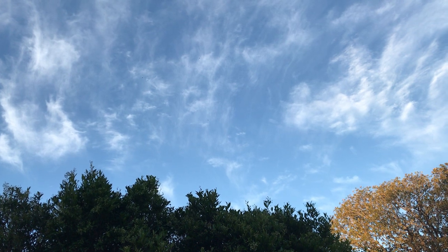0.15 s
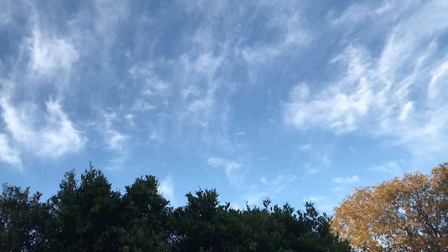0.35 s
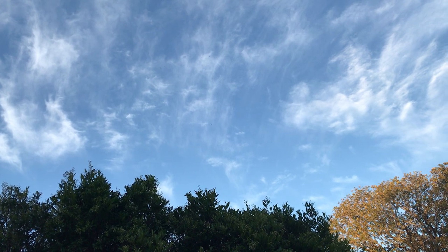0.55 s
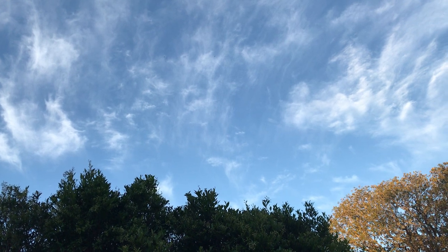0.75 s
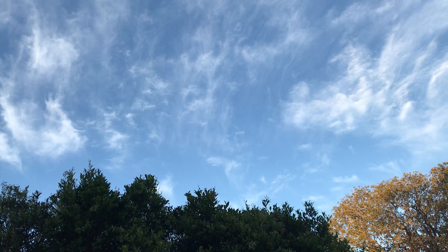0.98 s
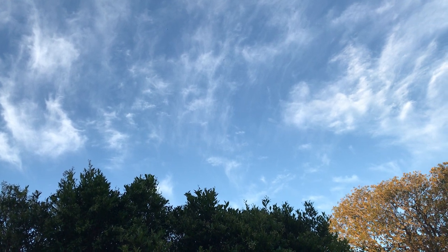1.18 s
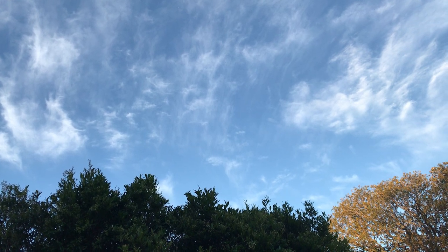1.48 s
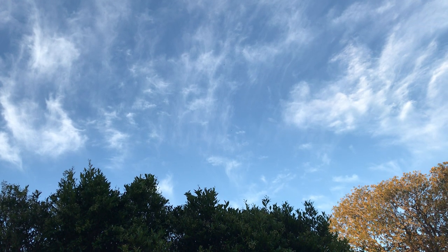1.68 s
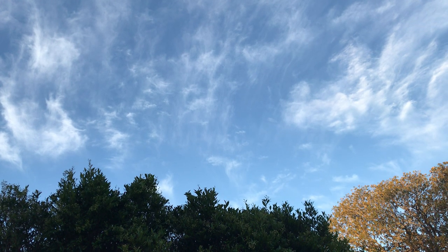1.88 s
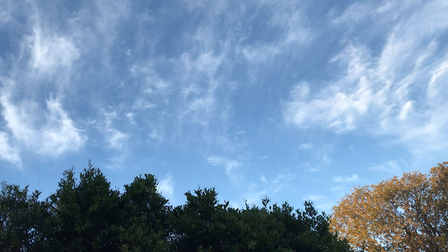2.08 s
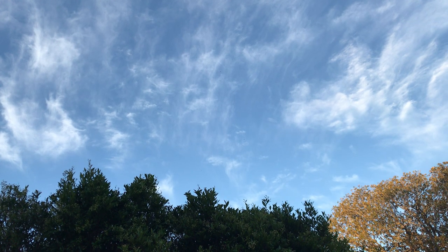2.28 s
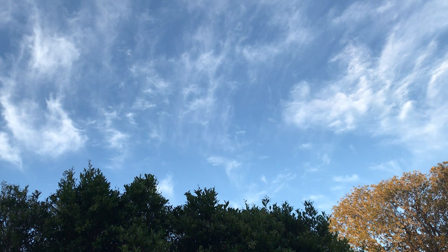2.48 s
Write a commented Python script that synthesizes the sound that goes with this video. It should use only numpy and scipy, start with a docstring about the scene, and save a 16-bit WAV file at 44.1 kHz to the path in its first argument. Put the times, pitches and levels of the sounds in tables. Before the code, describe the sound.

A magpie carols outdoors over a faint, steady distant rumble. From about 0.2 seconds it whistles in two overlapping tones, breaking into quick, slightly hoarse trills until 1 second. A small bird chirps faintly further off in the short pause. The magpie flutters on a low note from 1.2 to 1.6 seconds, then trills higher and slides down, ending near 2.4 seconds with a soft echo from the trees.

```python
"""A distant low rumble and faint hiss, then a magpie starts to carol outdoors. The two sides of its
voice box (the syrinx) whistle apart or together, beating where their pitches come close, and trill
quickly in between. A small bird chirps further off, a faint whistle fills a pause in the song,
and trees send back a soft echo."""
import sys
import numpy as np
from scipy import signal
from scipy.fft import rfft, irfft, next_fast_len
from scipy.io import wavfile
from scipy.ndimage import uniform_filter1d, map_coordinates

SR = 44100
rng = np.random.default_rng(int(sys.argv[2]) if len(sys.argv) > 2 else 0)


def put_to_file(sound):
    """Save the sound as 16-bit audio at rate SR, in the file named by the first command-line argument."""
    columns = np.atleast_2d(sound).T  # one column per channel
    safe = np.clip(columns, -1, 1)
    whole_steps = np.round(safe * 32767)
    wavfile.write(sys.argv[1], SR, whole_steps.astype(np.int16))


N = 116865
T = np.arange(N) / SR


def amp(db):
    """Turn decibels into a gain."""
    return 10 ** (np.asarray(db) / 20)


def unit(x):
    """Scale to an average power of 1."""
    return x / np.sqrt(np.mean(x ** 2) + 1e-20)


def along(points, hz):
    """Look up a table's value at any frequency."""
    freqs, values = np.transpose(points)
    return np.interp(np.log(hz + 1), np.log(freqs + 1), values)


def curves(rows):
    """Draw each column as a curve over time."""
    times, *columns = np.transpose(rows)
    return [np.interp(T, times, c) for c in columns]


def wobble(rate):
    """A smooth curve through `rate` random points a second."""
    return map_coordinates(rng.standard_normal(N), [T * rate], order=3, mode="wrap")


def filtered(x, gain):
    """Give each frequency its own gain."""
    m = next_fast_len(N + SR // 2)
    return irfft(rfft(x, m) * gain(np.fft.rfftfreq(m, 1 / SR)), m)[:N]


# Tone of the two background noises (frequency [Hz], relative level [dB])
RUMBLE = [(20, -38.5), (32, -18), (48, -3.5), (65, -3.5), (85, -3), (125, -9.5), (180, -12), (250, -19.5),
          (400, -30), (550, -32.5), (1000, -30), (1400, -35.5), (2000, -41), (3300, -46), (4700, -50),
          (6500, -93)]
HISS = [(4000, -34), (5000, -1), (7000, -4), (9300, -5), (10400, -8.5), (11800, -4), (15500, -6)]
def background():
    """Distant rumble and faint hiss, with a wavering 84 Hz drone."""
    rumble = unit(filtered(rng.standard_normal(N), lambda hz: amp(along(RUMBLE, hz))))
    hiss = unit(filtered(rng.standard_normal(N), lambda hz: amp(along(HISS, hz))))
    drone = (1 + .88 * wobble(9.07)) * np.sin(2 * np.pi * 84 * T + wobble(6.1))
    return amp(-50) * rumble + amp(-78) * hiss + amp(-54.5) * unit(drone)


def tree_echo(x, build_s=.045, decay_s=.5):
    """Trees scatter the sound into a blur that dies quickly."""
    t = T[:SR]
    tail = rng.standard_normal(SR) * amp(-60 * t / decay_s) * (1 - np.exp(-t / build_s))
    return amp(-36) * signal.fftconvolve(x, tail / np.linalg.norm(tail))[:N]


# A far bird's note (time [s], pitch [Hz], level [dB])
FAR_NOTE = [(1.05, 980, -62.5), (1.11, 1015, -64), (1.14, 1054, -63)]
def far_whistle():
    """A faint, plain note in the song's pause."""
    strength, phase, _ = syrinx_side(FAR_NOTE)
    return strength * np.cos(phase)


# Chirps (time [s], length [s], start pitch [Hz], end pitch [Hz], level [dB], relative overtone [dB])
CHIRPS = [(1.084, 0.027, 2700, 2945, -62, -4.5), (1.098, 0.033, 3800, 4380, -62.5, -11),
          (1.138, 0.032, 4350, 4420, -74, -20), (1.166, .022, 5200, 5700, -75, -23),
          (1.612, 0.018, 5400, 6160, -78, -14), (1.903, 0.054, 2350, 3324, -56, -5)]
def small_bird():
    """Short rising chirps, each with one overtone an octave up."""
    out = np.zeros(N)
    for start, length, start_hz, end_hz, db, overtone_db in CHIRPS:
        progress = np.clip((T - start) / length, 0, 1)
        hz = start_hz + (end_hz - start_hz) * np.sin(progress * np.pi / 2)
        phase = 2 * np.pi * np.cumsum(hz) / SR + .3 * wobble(420)
        tone = np.sin(phase) + amp(overtone_db) * np.sin(2 * phase)
        out += amp(db) * np.sin(np.pi * progress) * tone
    return out


def trill(rows, peak_s, shape, uneven=.2):
    """A quick swing of pitch and level, lined up on peak_s; shape above 0 sharpens the pitch peaks."""
    rate, swing_hz, swing_db = curves(rows)
    turn = 2 * np.pi * np.cumsum(rate) / SR
    turn = turn - np.interp(peak_s, T, turn) + uneven * wobble(40)
    swing = np.array([swing_hz * (np.cos(turn) + shape * np.cos(2 * turn)), swing_db * np.cos(turn)])
    return swing * (1 + uneven * wobble(70))


SHAKE_HZ = 515
# Hoarseness of the voice (time [s], roughness [0-1])
HOARSENESS = [(.2, .3), (.235, 0.05), (.35, 0.04), (.368, 0.36), (.41, 0.48), (.445, 0.2), (.53, 0.09),
              (.71, 0.13), (.73, 0.3), (.81, 0.4), (.83, 0.08), (1.04, 0.13), (1.19, 0.31), (1.27, 0.07),
              (1.62, 0), (1.66, 0.42), (1.85, 0.19), (1.91, 0.07), (2.36, 0.08)]
def syrinx_side(rows, swing=(0, 0), fade_s=.0076):
    """One side of the voice box whistles; its strength and phase shake when hoarse."""
    hz, db = curves(rows)
    hz, db = hz + swing[0], db + swing[1]
    rough, = curves(HOARSENESS)
    fade = np.clip(np.minimum(T - rows[0][0], rows[-1][0] - T) / fade_s + .5, 0, 1)
    strength = amp(db) * np.sin(fade * np.pi / 2) ** 2 * (1 + rough * wobble(SHAKE_HZ))
    phase = 2 * np.pi * np.cumsum(hz) / SR + .51 * rough * wobble(SHAKE_HZ)
    return strength, phase, hz


def syrinx_note(sides, overtones, throat, coupling=0):
    """Two sides close in pitch make extra tones; throat and beak colour the overtones."""
    live = np.flatnonzero(sum(abs(s[0]) for s in sides))  # samples that sound
    strength, phase, hz = np.transpose(np.array(sides)[:, :, live], axes=(1, 0, 2))
    total = np.sqrt(np.sum(strength ** 2, axis=0) + 1e-14)
    beat = phase[-1] - phase[0]
    gap_hz = abs(hz[-1] - hz[0]) + 1
    overlap = (len(sides) - 1) * 2 * abs(strength[0] * strength[-1]) / total ** 2
    # The sides interact most about 226 Hz apart, and quickly less past 410 Hz.
    link = coupling * overlap * np.exp(-.5 * (np.log2(gap_hz / 226) / .91) ** 2)
    link /= 1 + (gap_hz / 410) ** 12
    above = strength[-1] * np.cos(phase[-1] + beat)
    below = .73 * strength[0] * np.cos(phase[0] - beat)
    sound = np.sum(strength * np.cos(phase), axis=0) + link * (above + below)
    # Overtones: 2 to 11 times each pitch, plus sums of the two pitches.
    k = np.arange(2, 12)[:, None, None]
    multiples = lambda v: np.concatenate([k * v, (k - 1) * v[0] + v[-1]], axis=1)
    shake = k * .13 * np.sqrt(overlap) * wobble(SHAKE_HZ)[live]
    waves = np.cos(multiples(phase) + shake) * (1 + .49 * link * np.cos(beat))
    treble = np.clip((multiples(hz) - 5000) / 600, 0, 1)  # "mid" below 5 kHz, "treble" above 5.6
    rolloff_db = -2 * np.clip(k - 8, 0, 2)
    balance = np.vstack([abs(strength) / total, 1.3 * overlap])
    colour = amp(along(throat, multiples(hz)) + rolloff_db) * balance
    flutter = total / np.sqrt(abs(uniform_filter1d(total ** 2, SR // 50)) + 1e-14)
    for share, db in zip((1 - treble, treble), curves(overtones)):
        weight = colour * share
        weight /= np.sqrt(np.sum(weight ** 2, axis=(0, 1)) + 1e-12)
        sound += flutter * amp(db[live]) * np.sum(weight * waves, axis=(0, 1))
    return np.bincount(live, np.sqrt(2) * sound, N)


# A lead-in note, then each side's whistle (time [s], pitch [Hz], level [dB])
LEAD_IN = [(.188, 1750, -71), (.204, 1863, -63), (.216, 1770, -68), (.23, 1725, -55.5)]
OPENING_LOW = [(0.205, 995, -51), (0.225, 1225, -50), (0.245, 1231, -39.5), (0.265, 1222, -37.5),
               (0.29, 1238, -31.5), (0.31, 1219, -31), (0.325, 1190, -28), (0.343, 1219, -30),
               (0.372, 1250, -38.5), (0.395, 1226, -50), (0.425, 1135, -54.5), (0.46, 1221, -63),
               (0.495, 1370, -55), (0.54, 1328, -57.5), (0.6, 1382, -58.5), (0.675, 1349, -50.5),
               (0.708, 1316, -38.5), (0.724, 1295, -46)]
OPENING_HIGH = [(0.362, 1608, -47), (0.375, 1659, -45.5), (0.395, 1735, -51), (0.412, 1510, -49),
                (0.44, 1600, -39), (0.46, 1645, -43.5), (0.475, 1563, -46), (0.497, 1591, -40.5),
                (0.535, 1542, -48), (0.6, 1538, -46.5), (0.65, 1486, -45), (0.685, 1504, -42),
                (0.705, 1410, -41), (0.722, 1325, -35)]
# Overtones (time [s], mid level [dB], treble level [dB])
OPENING_OVERTONES = [(0.2, -76, -99), (0.258, -67, -92.5), (0.296, -54.5, -66.5), (0.33, -53, -60.5),
                     (0.466, -67.5, -80.5), (0.486, -59.5, -72.5), (0.53, -60.5, -74.5), (0.574, -62, -73),
                     (0.702, -55, -62.5), (0.725, -60, -73)]
# Throat and beak colour (frequency [Hz], relative level [dB])
THROAT = [(2000, -14), (2500, 2.5), (3000, -6), (3600, 10), (4100, -3), (4650, 1), (5200, -20), (6000, -7),
          (6600, -10), (7250, -1), (7850, -21.5), (8600, -7), (9300, -14), (10200, -24.5), (10900, -16),
          (12000, -21), (13400, -15.5), (15500, -36.5)]
def magpie_opening():
    """A tiny note leads into a whistle that splits in two."""
    sides = [syrinx_side(OPENING_LOW), syrinx_side(OPENING_HIGH)]
    duet = syrinx_note(sides, OPENING_OVERTONES, THROAT, coupling=.35)
    return duet + syrinx_note([syrinx_side(LEAD_IN)], OPENING_OVERTONES, THROAT)


# Each side's whistle (time [s], pitch [Hz], level [dB])
CHATTER_LOW = [(.722, 1010, -46.5), (.742, 1035, -69), (.762, 995, -63), (.8, 952, -71), (.81, 918, -40),
               (.815, 830, -54)]
CHATTER_HIGH = [(.724, 1800, -47), (.742, 1498, -50.5), (.758, 1574, -48.5), (.776, 1596, -50.5),
                (.795, 1693, -51), (.812, 1425, -47.5)]
# Trill (time [s], rate [Hz], pitch swing [Hz], level swing [dB]); negative: softer when higher
CHATTER_TRILL = [(.724, 73, 118, 3), (.755, 110, 117.6, -1), (.785, 54, 106, 9), (.812, 28, 99.7, 4.5)]
# Overtones of chatter, warble and chord (time [s], mid level [dB], treble level [dB])
MIDDLE_OVERTONES = [(0.735, -61.5, -76), (0.753, -73.5, -89), (0.821, -65, -88), (0.917, -73.5, -78.5),
                    (0.957, -57.5, -72.5), (0.967, -70.5, -88), (1.045, -68, -92)]
def magpie_chatter():
    """The high side trills hoarsely over the low one."""
    swing = trill(CHATTER_TRILL, peak_s=.5, shape=.084)
    return syrinx_note([syrinx_side(CHATTER_LOW), syrinx_side(CHATTER_HIGH, swing)], MIDDLE_OVERTONES, THROAT)


# One side's whistle (time [s], pitch [Hz], level [dB])
WARBLE = [(.813, 1232, -41.5), (.836, 1193, -36.5), (.866, 1146, -38.5), (.88, 1124, -35.5),
          (.91, 1121, -36), (.937, 1183, -36.5), (.954, 1048, -37.5), (.967, 1073, -42)]
# Trill (time [s], rate [Hz], pitch swing [Hz], level swing [dB])
WARBLE_TRILL = [(.812, 92, 62, 1), (.87, 94, 85, 2), (.91, 86, 30, 2), (.945, 86, 94, 2), (.96, 86, 17, 0)]
# Throat colour for lower notes (frequency [Hz], relative level [dB])
LOW_THROAT = [(1700, 5), (2550, -3), (3400, -6.5), (4500, -16.5), (6000, -44), (6900, 6), (7400, -8.5),
              (8100, -18.5), (9000, -11), (10500, -19.5), (15500, -37)]
def magpie_warble():
    """One side trills very fast."""
    swing = trill(WARBLE_TRILL, peak_s=.88, shape=-.36)
    return syrinx_note([syrinx_side(WARBLE, swing)], MIDDLE_OVERTONES, LOW_THROAT)


# Each side's whistle (time [s], pitch [Hz], level [dB])
CHORD_LOW = [(.966, 1061, -50.5), (.99, 1038, -48.5), (1.03, 1030, -48.5), (1.048, 1095, -53.5)]
CHORD_HIGH = [(.966, 1364, -49.5), (.988, 1457, -51.5), (1.0, 1389, -56), (1.035, 1450, -52),
              (1.048, 1408, -53)]
def magpie_chord():
    """Both sides hold a short, soft note."""
    sides = [syrinx_side(CHORD_LOW), syrinx_side(CHORD_HIGH)]
    return syrinx_note(sides, MIDDLE_OVERTONES, LOW_THROAT, coupling=.31)


# One side's whistle (time [s], pitch [Hz], level [dB])
LOW_NOTE = [(1.182, 766, -50.5), (1.215, 791, -52), (1.245, 890, -43.5), (1.29, 922.5, -42),
            (1.35, 892, -37.5), (1.39, 860, -35), (1.465, 851, -32), (1.5, 832.3, -37), (1.58, 817.4, -38),
            (1.624, 775, -43)]
# Trill (time [s], rate [Hz], pitch swing [Hz], level swing [dB])
LOW_FLUTTER = [(1.182, 60, 70, 3), (1.28, 61.85, 65, -5), (1.39, 65, 45.6, -1.8), (1.48, 63.3, 42, 1.7),
               (1.515, 50, 58, 1), (1.54, 67.5, 75, -1.5), (1.625, 62.8, 88, 2.5)]
# Overtones (time [s], mid level [dB], treble level [dB])
LOW_OVERTONES = [(1.2, -74, -96), (1.296, -85, -105), (1.31, -76, -91.5), (1.464, -65, -73),
                 (1.62, -77, -86)]
def magpie_low_trill():
    """One side flutters on a long, low note."""
    swing = trill(LOW_FLUTTER, peak_s=1.41, shape=.33)
    return syrinx_note([syrinx_side(LOW_NOTE, swing)], LOW_OVERTONES, LOW_THROAT)


# Each side's whistle (time [s], pitch [Hz], level [dB])
CLOSING_LOW = [(1.665, 1245, -65.5), (1.713, 1258, -55.5), (1.757, 1199, -51.5), (1.805, 1291, -51.5),
               (1.86, 1289, -45), (1.92, 1249, -37), (1.96, 1196, -35.5), (2.005, 1143, -32.5),
               (2.05, 1143, -35), (2.1, 1137, -36.5), (2.15, 1102, -36), (2.2, 1069, -35.5),
               (2.26, 1013, -35.5), (2.325, 996, -34), (2.36, 995, -42.5), (2.372, 1055, -64)]
CLOSING_HIGH = [(1.655, 1755, -68), (1.685, 1708, -56.5), (1.75, 1653, -52.5), (1.797, 1732, -51),
                (1.86, 1711, -44.5), (1.9, 1764, -45.5), (1.93, 1836, -40.5), (1.953, 1755, -44.5),
                (1.972, 1676, -41), (1.992, 1445, -52), (2.015, 1427, -49.5), (2.04, 1285, -41),
                (2.1, 1229, -39), (2.2, 1163, -36.5), (2.26, 1106, -41), (2.325, 1101, -42),
                (2.365, 1094, -46.5)]
# Trill (time [s], rate [Hz], pitch swing [Hz], level swing [dB])
CLOSING_TRILL = [(1.655, 43.6, 55, 9), (1.78, 43.6, 60, 8), (1.83, 48, 60, 6), (1.87, 50, 45, 3),
                 (1.92, 50, 5, .3), (1.95, 50, 0, 0)]
# Overtones (time [s], mid level [dB], treble level [dB])
CLOSING_OVERTONES = [(1.655, -76, -89), (1.701, -71, -93), (1.843, -64, -83), (1.925, -56.5, -72),
                     (1.995, -54, -68.5), (2.149, -60.5, -75.5), (2.205, -57.5, -68), (2.343, -63.5, -82.5),
                     (2.37, -82, -99)]
# Throat colour (frequency [Hz], relative level [dB])
CLOSING_THROAT = [(2000, 2.5), (2450, -3.5), (3000, -7), (3600, 2.5), (4100, -5.5), (4650, -4.5),
                  (5200, -25), (6000, -16.5), (6700, -7), (7250, -10.5), (7850, -27.5), (8500, -6),
                  (9100, -13), (10200, -29), (11300, -18), (13700, -21.5), (15500, -27.5)]
def magpie_closing():
    """Both sides trill, the low one just behind, then fall close together and beat."""
    high = syrinx_side(CLOSING_HIGH, trill(CLOSING_TRILL, peak_s=1.751, shape=-.55))
    low = syrinx_side(CLOSING_LOW, .94 * trill(CLOSING_TRILL, peak_s=1.76, shape=-.55))
    return syrinx_note([low, high], CLOSING_OVERTONES, CLOSING_THROAT, coupling=.24)


def scene():
    """Background, echo and birds; the far birds carry more echo."""
    song = magpie_opening() + magpie_chatter() + magpie_warble()
    song += magpie_chord() + magpie_low_trill() + magpie_closing()
    far_birds = small_bird() + far_whistle()
    echo = tree_echo(song + amp(28.5) * far_birds)
    return (background() + echo + far_birds + song)[None]


def record(dry):
    """Cut everything above 15700 Hz."""
    return filtered(dry[0], lambda hz: hz < 15700)[None]


dry = scene()
out = record(dry)
put_to_file(out)
```